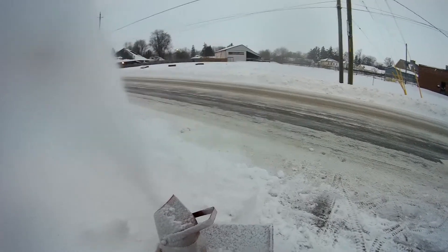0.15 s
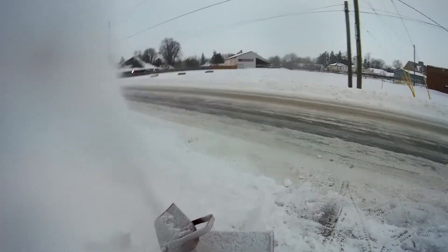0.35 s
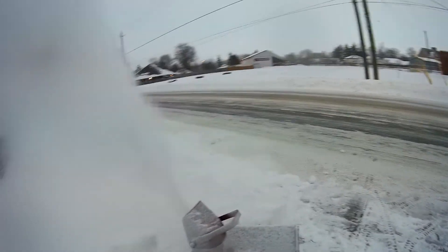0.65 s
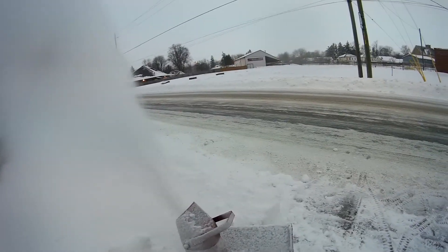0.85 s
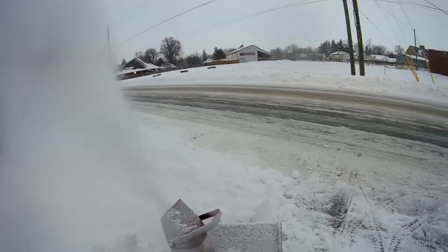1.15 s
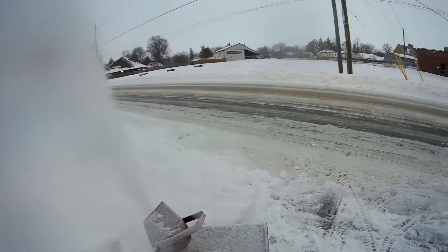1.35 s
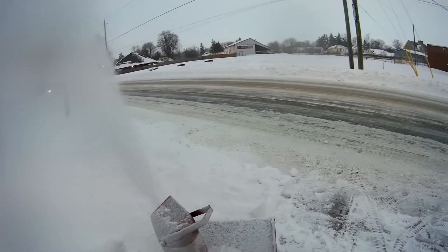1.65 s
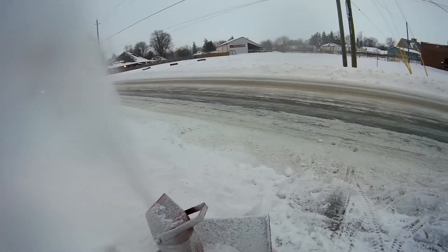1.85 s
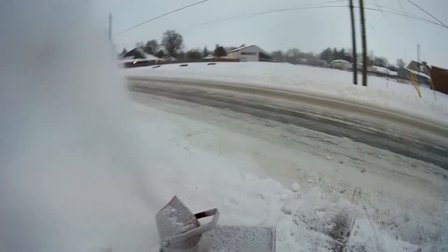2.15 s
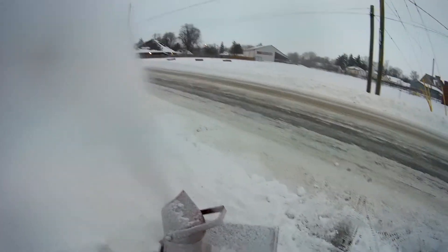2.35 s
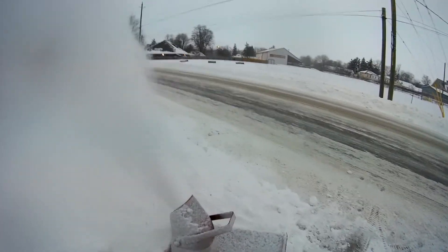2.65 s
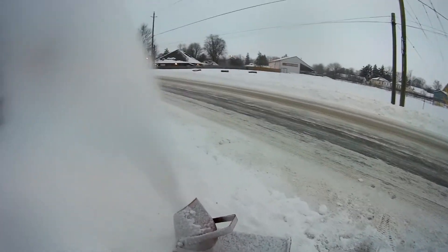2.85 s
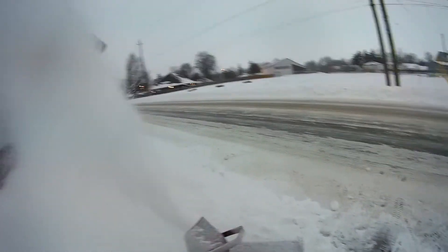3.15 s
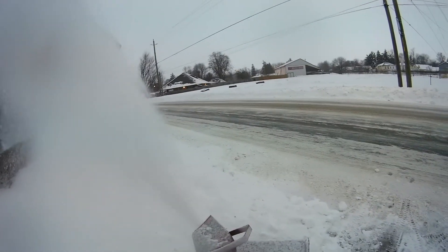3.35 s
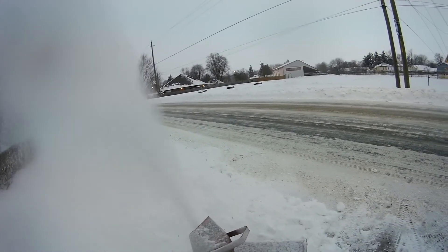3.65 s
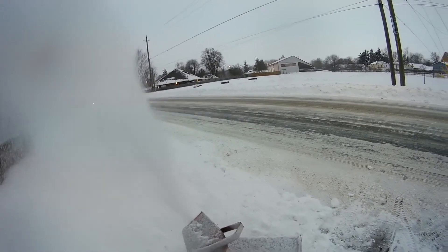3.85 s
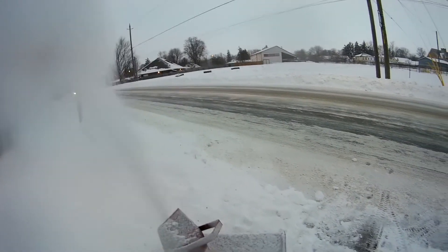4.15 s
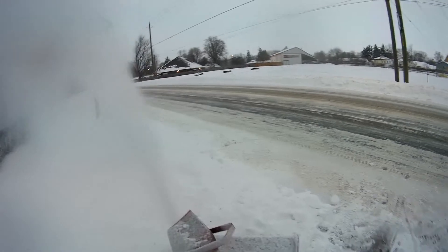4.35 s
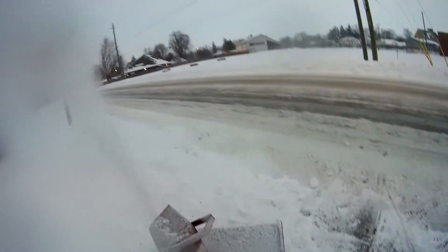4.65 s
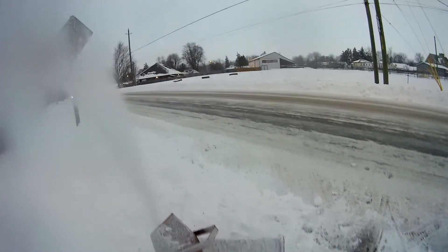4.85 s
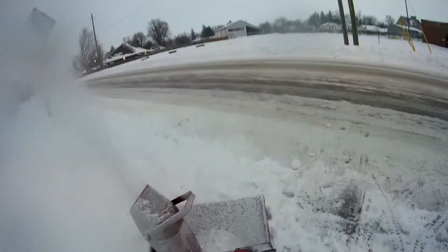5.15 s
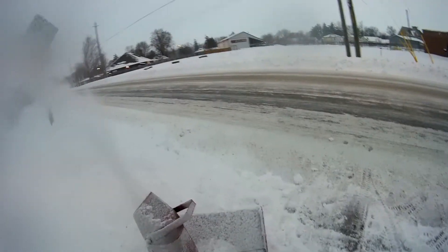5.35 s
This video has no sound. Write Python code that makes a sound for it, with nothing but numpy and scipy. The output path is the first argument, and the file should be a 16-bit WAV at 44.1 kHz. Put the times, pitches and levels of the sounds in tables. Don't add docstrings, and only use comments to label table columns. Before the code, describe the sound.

A walk-behind snowblower runs throughout, very close to a small cased camera microphone outdoors in snow. Its rapid, uneven chugging rises slightly, then bogs down near three seconds with harsher exhaust hiss, recovers, stumbles at four seconds as the machine turns, and runs faster to the end. Steel rattle, valve ticks and fizzing snow fill the sound.

```python
import sys
import numpy as np
from scipy import signal
from scipy.fft import rfft, irfft, next_fast_len
from scipy.io import wavfile
from scipy.ndimage import uniform_filter1d

SR = 44100
rng = np.random.default_rng(int(sys.argv[2]) if len(sys.argv) > 2 else 0)


def elevation(decibels):
    levels = np.asarray(decibels, float)
    return 10 ** (levels / 20)


def generate_wav(sig):
    pcm = np.round(np.clip(np.atleast_2d(sig).T, -1, 1) * 32767).astype(np.int16)
    wavfile.write(sys.argv[1], SR, pcm)


N = 242991
TURNED_S = 4.03
PULSE = 1600

# (frequency [Hz], level per Hz [dB])
CASE = [(1900, 10), (2120, -1.5), (2740, -9), (3660, 2.5), (5500, -7), (6600, -17), (7200, -10),
        (8600, -11.5), (9000, -24.5), (9800, -16.5), (10600, -20), (12000, -15.5), (12330, -12),
        (13200, -14)]


def evened(x):
    return x / np.sqrt(np.mean(x ** 2) + 1e-20)


def coloured(x, points, centre_hz=1000, octaves=99, fall_db=144.0):
    size = next_fast_len(N)
    hz = np.fft.rfftfreq(size, 1 / SR) + 1
    f, db = np.transpose(points)
    beyond = np.maximum(np.log2(hz / f[-1]), 0) + np.maximum(np.log2(f[0] / hz), 0)
    off_centre = np.log2(hz / centre_hz) / octaves
    shape = elevation(np.interp(np.log(hz), np.log(f), db) - fall_db * beyond - 7.3 * off_centre ** 2)
    return irfft(rfft(x, size) * shape / np.sqrt(np.mean(shape ** 2)), size)[:N]


def lumps(ms, depth_db):
    size = int(ms * SR / 1000)
    slow = uniform_filter1d(uniform_filter1d(rng.standard_normal(N), size), size)
    return elevation(depth_db * evened(slow))


def swell(rise_ms):
    u = np.arange(PULSE) / SR / (rise_ms / 1000)
    return u * np.exp(1 - u)


def ring(hz, rise_ms):
    return swell(rise_ms) * np.sin(2 * np.pi * hz * np.arange(PULSE) / SR)


def strokes(turns, share, scatter_db, chance):
    at = np.flatnonzero(np.diff(np.floor(turns - share)))
    train = np.zeros(N)
    train[at] = elevation(scatter_db * chance[:len(at)])
    return train


def puffs(turns, rows, level_db):
    out = np.zeros(N)
    alike = 0.2
    for share, ms, db, hz, octaves, scatter in rows:
        train = strokes(turns, share, scatter, rng.uniform(-1.7, 1.7, 200)) * elevation(db + level_db)
        gate = signal.oaconvolve(train, swell(ms) ** 2)[:N]
        knock = signal.oaconvolve(train, swell(ms) ** 2 * rng.choice([-1., 1.], PULSE))[:N]
        burst = np.sqrt(1 - alike) * gate * rng.standard_normal(N) + np.sqrt(alike) * knock
        out += coloured(burst, CASE, hz, octaves)
    return out


def orders(turns, rows, load):
    return sum(np.sqrt(2) * elevation(db + more_db * load) * np.cos(2 * np.pi * (k * turns + phase))
               for k, db, more_db, phase in rows)


def level(rule, load, clump_db):
    idle_db, rise_db, ease_db, share = rule
    return idle_db + rise_db * load - ease_db * load ** 2 + share * clump_db


def engine_speed():
    # (time [s], speed [firings/s])
    speeds = [(0.0, 27.31), (0.49, 27.123), (0.88, 28.03), (1.09, 28.179), (1.58, 28.758), (2.05, 27.257),
              (2.29, 26.901), (2.74, 25.531), (2.99, 25.439), (3.21, 26.228), (3.47, 27.424),
              (3.74, 28.152), (4.27, 28.838), (4.8, 29.174), (5.11, 29.596), (5.52, 28.618)]
    s, per_s = np.transpose(speeds)
    return np.interp(np.arange(N) / SR, s, per_s)


def clumps():
    # (time [s], length [s], lift [dB])
    hits = [(0.03, 0.22, 5.5), (0.377, 0.22, 0.5), (1.601, 0.22, 1), (1.897, 0.089, 1.5), (2.2, 0.19, 3),
            (2.799, 0.38, 2.5), (3.512, 0.17, 3.0), (4.206, 0.18, 0.5), (5.065, .13, 8.5)]
    t = np.arange(N) / SR
    return sum(db * np.exp(-((t - s) / length) ** 2) for s, length, db in hits)


def blows(turns, load, clump_db):
    # (share of cycle [0-1], frequency [Hz],
    # rise [ms], size when light [gain], size when heavy [gain], change once turned [gain])
    swings = [(-0.143, 319.0, 1.73, 0.12, -0.08, -0.06), (-0.108, 192.0, 2.18, 0.59, 0.52, 0.07),
              (-0.092, 497.0, 0.76, -0.21, -0.2, -0.04), (-0.077, 421.0, 0.44, -0.07, 0.28, -0.16),
              (-0.041, 682.0, 2.23, -0.01, -0.12, -0.02), (-0.007, 179.0, 1.32, -0.0, -0.3, 0.25),
              (0.187, 284.0, 4.08, -0.16, -0.03, -0.03), (0.203, 322.0, 2.0, 0.16, 0.16, -0.03),
              (0.309, 701.0, 1.02, 0.03, 0.06, -0.04), (0.381, 256.0, 1.8, 0.11, 0.05, 0.06),
              (0.512, 636.0, 4.57, -0.08, -0.04, 0.06), (0.53, 342.0, 4.13, 0.03, -0.38, 0.07),
              (0.584, 291.0, 3.8, 0.01, 0.25, -0.08), (0.589, 357.0, 1.14, 0.15, -0.08, 0.2),
              (0.736, 410.0, 4.04, -0.01, -0.13, 0.08)]
    # (level at no load [dB], rise per load [dB], easing at full load [dB], share of clump lift [ratio])
    blast_rule = (-0.46, 1.34, 0.95, 0.25)
    gain, heavy = elevation(level(blast_rule, load, clump_db)), load ** 2
    charge = rng.uniform(-1.7, 1.7, 200)
    turned = np.arange(N) > TURNED_S * SR
    wobble = turns + .0015 * evened(uniform_filter1d(rng.standard_normal(N), 2000))
    out = np.zeros(N)
    for share, hz, ms, light, full, change in swings:
        size = light * (1 - heavy) + full * heavy + change * turned
        train = strokes(wobble, share, 0.12, charge) * gain * size
        out += signal.oaconvolve(train, ring(hz, ms))[:N]
    return out


def stumble():
    # (time [s], frequency [Hz], rise [ms], level [dB], direction [sign])
    jolts = [(4.0134, 192, 2.2, -6.0, -1), (4.0162, 300, 1.1, -4.0, 1), (4.0225, 280, 1.2, -7.0, -1)]
    out = np.zeros(N)
    for s, hz, ms, db, way in jolts:
        out[round(s * SR):][:PULSE] += way * elevation(db) * ring(hz, ms)
    return out


def blowdown(turns, load, clump_db):
    # (share of cycle [0-1], rise [ms], level [dB], centre [Hz], width [octaves], scatter [dB])
    low_puffs = [(-.058, 1.6, 1.5, 4770, 0.86, 1.8), (-.058, 1.73, -0.5, 5310, 0.24, 2.5),
                 (-.058, 2.04, -6.5, 2670, 0.38, 2.3)]
    high_puffs = [(-.065, 2.3, -1, 8450, 0.1, 2.4), (-.065, 2.3, 0, 8100, 0.33, 2.3),
                  (-.062, 1.8, -9.5, 13100, 0.46, 2.2)]
    # (level at no load [dB], rise per load [dB], easing at full load [dB], share of clump lift [ratio])
    low_rule = (-48.5, 30, 14.5, 0.53)
    high_rule = (-53.5, 36, 21.5, 0.65)
    low = puffs(turns, low_puffs, level(low_rule, load, clump_db))
    return low + puffs(turns, high_puffs, level(high_rule, load, clump_db))


def intake(turns, load, clump_db):
    # (share of cycle [0-1], rise [ms], level [dB], centre [Hz], width [octaves], scatter [dB])
    rush = [(.7, 3.3, 2, 3700, 0.35, 2.1), (.32, 2.2, 4.1, 4700, 0.4, 1.7)]
    throat = [(.6, 6.5, 1.5, 5600, .05, 1.5), (.05, 5.5, .5, 5600, .05, 1.5),
              (.32, 5.5, -.5, 5600, .05, 1.5)]
    # (level at no load [dB], rise per load [dB], easing at full load [dB], share of clump lift [ratio])
    air_rule = (-61, 24.5, 6.5, -3.5)
    return puffs(turns, rush + throat, level(air_rule, load, clump_db))


def valves(turns):
    # (share of cycle [0-1], rise [ms], level [dB], centre [Hz], width [octaves], scatter [dB])
    ticks = [(0.51, 2.2, -52, 12000, 0.51, 0), (0.41, 1.8, -49, 3940, 0.41, 5),
             (0.29, 2.4, -51, 5000, 0.92, 4.5), (0.53, 1.35, -45, 6400, 0.51, 0.5),
             (.57, 2.2, -60, 4800, .25, 7), (0.15, 1.5, -54, 8000, 0.42, 4)]
    pings = [(0.5, 3.5, -62.5, 12330, .012, 3.5), (0.51, 3.2, -69, 13170, .012, 3.5)]
    return puffs(turns, ticks + pings, 0)


def shaft(turns, load):
    # (order [multiple], rms at no load [dB], more at full load [dB], phase [turns])
    shakes = [(1, -33.5, -1.0, -.39), (2, -38.0, 8.5, .34)]
    return orders(turns, shakes, load ** 2)


def gears(turns, load):
    # (order [multiple], rms at no load [dB], more at full load [dB], phase [turns])
    straight_notes = [(13, -41, 2, 0.05), (15, -35, -22, .7), (21, -41, 1, .0), (22, -47, 9, 0.2),
                      (23, -42, 6, 0.47), (25, -45, 11, 0.3), (26, -50, 13, .4), (28, -54, 13, .3)]
    turned_notes = [(21, -39, 1, .9), (24, -41, 1, .1)]
    turned = np.clip((np.arange(N) / SR - TURNED_S) / .05, 0, 1)
    before = (1 - turned) * orders(turns, straight_notes, load ** 2)
    after = turned * orders(turns, turned_notes, load ** 2)
    return lumps(250.0, 1.5) * (before + after)


def belt(turns, load):
    slip_per_s, grip_per_s, lead = 2.16, 1.081, .331
    slip = np.cumsum(slip_per_s * load - grip_per_s * load ** 2) / SR + lead * load
    return .232 + 1.898 * turns - slip


def impeller(blades, load):
    # (order [multiple], rms at no load [dB], more per load [dB], phase [turns])
    blade_tones = [(1, -41.5, 12.3, -0.56), (2, -34.5, 2.3, -0.018), (3, -39.5, 2.2, -0.41),
                   (4, -65, 4.0, -0.71)]
    return orders(blades, blade_tones, load)


def housing(turns, blades, load, clump_db):
    # (frequency [Hz], level per Hz [dB])
    panels = [(45, -10), (90, -4), (160, -1), (320, -3), (400, 3), (520, -2.5), (670, -1.5), (770, -0.5),
              (890, 0), (1030, -5.5), (1230, -3.5), (1450, -12), (1750, -12.5), (2150, -46.5)]
    # (level at no load [dB], rise per load [dB], easing at full load [dB], share of clump lift [ratio])
    rattle_rule = (-22.5, 2.5, 2, 0.09)
    firing = 1 + 0.1 * np.cos(2 * np.pi * (turns + .05))
    thrown = 1 + 0.1 * np.cos(2 * np.pi * blades)
    shake = firing * thrown * lumps(3.3, 1.2)
    rattle = evened(coloured(shake * rng.standard_normal(N), panels, fall_db=37.0))
    return elevation(level(rattle_rule, load, clump_db) + 2.0) * rattle


def snow(load, clump_db):
    # (level at no load [dB], rise per load [dB], easing at full load [dB], share of clump lift [ratio])
    flow_rule = (-45, 0.5, 1.1, 0.38)
    grains = lumps(1.7, 2.0) * rng.standard_normal(N)
    return elevation(level(flow_rule, load, clump_db) + 0.5) * coloured(grains, CASE, 2600, 2.13)


def snaps():
    # (time [s], level [dB])
    clicks = [(0.1027, -62), (1.3987, -64), (1.9646, -67), (2.676, -55), (2.7935, -56)]
    out = np.zeros(N)
    for s, db in clicks:
        out[round(s * SR)] = elevation(db + 12)
    return signal.lfilter([1, -2, 1], [1], out)


def scene():
    speed = engine_speed()
    turns = .2 + np.cumsum(speed) / SR
    load = (29.5 - speed) / 4
    blades = belt(turns, load)
    clump_db = clumps()
    mix = blows(turns, load, clump_db) + stumble()
    mix += blowdown(turns, load, clump_db) + intake(turns, load, clump_db) + valves(turns)
    mix += shaft(turns, load) + gears(turns, load) + impeller(blades, load)
    mix += housing(turns, blades, load, clump_db) + snow(load, clump_db) + snaps()
    return mix[None]


def band_limit(x):
    return signal.sosfilt(signal.butter(12, 15850, fs=SR, output="sos"), x)


def record(dry):
    faint_hz, faint_db = 14300, -105
    sensed = np.clip(dry - uniform_filter1d(dry, SR // 4), -1, 1)
    padded = np.pad(sensed, ((0, 0), (0, 2048)), "reflect")
    hz, _, z = signal.stft(padded, SR, nperseg=1024, boundary="even")
    near = np.sqrt(uniform_filter1d(abs(z) ** 2, size=9, axis=1))
    kept = np.where(hz[:, None] > faint_hz, np.clip(near / elevation(faint_db) - 1, 0, 1), 1)
    heard = signal.istft(z * kept, SR, nperseg=1024)[1][:, :N]
    fade = np.minimum(np.arange(N)[::-1] / 120, 1)
    return band_limit(heard * fade)


dry = scene()
out = record(dry)
generate_wav(out)
```